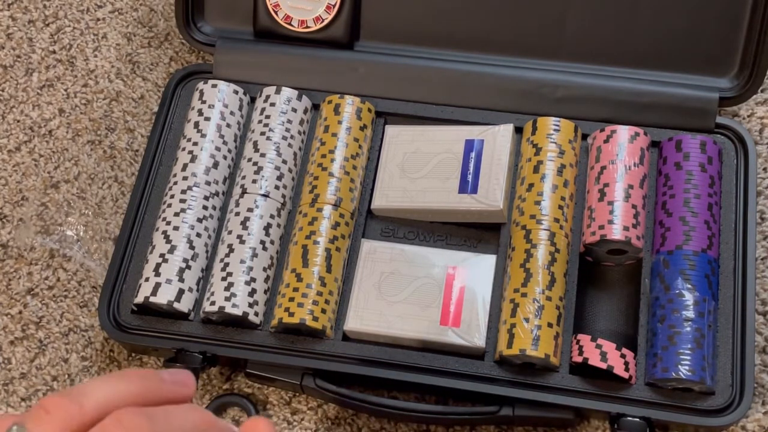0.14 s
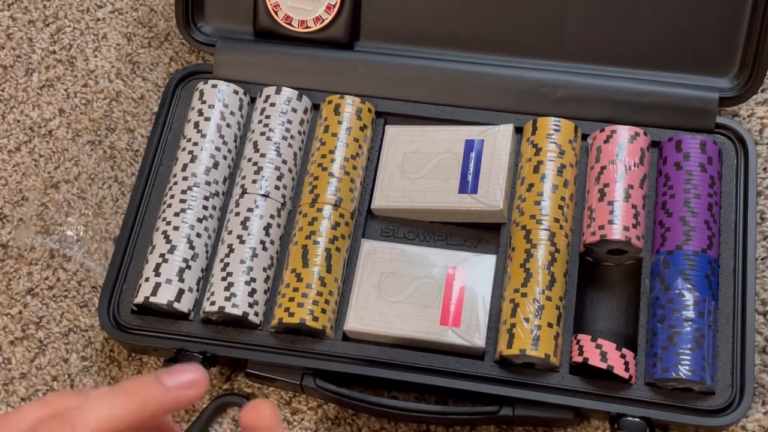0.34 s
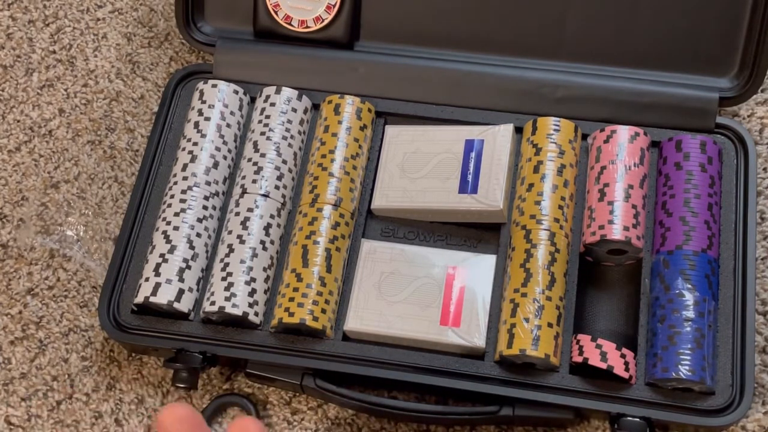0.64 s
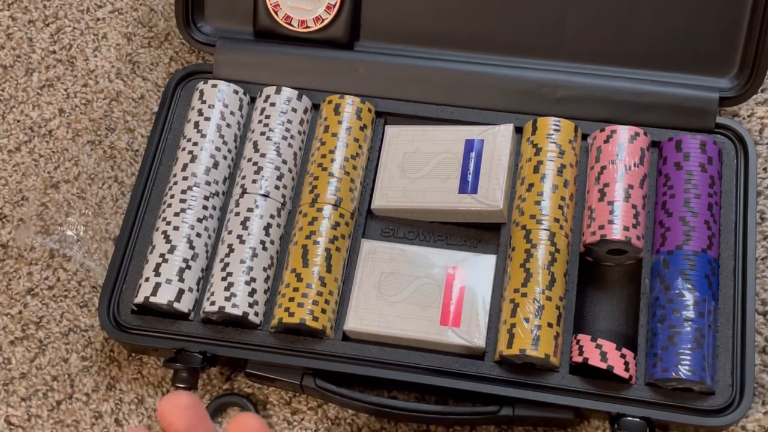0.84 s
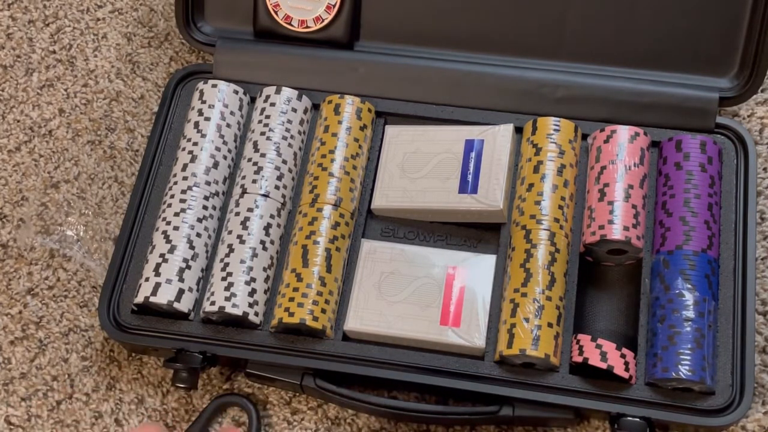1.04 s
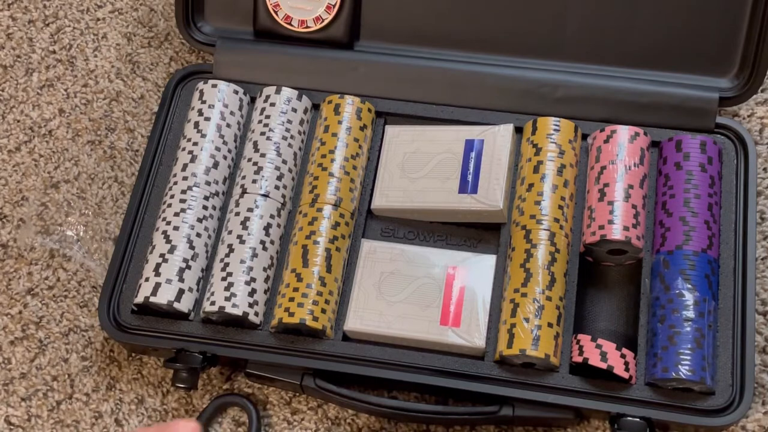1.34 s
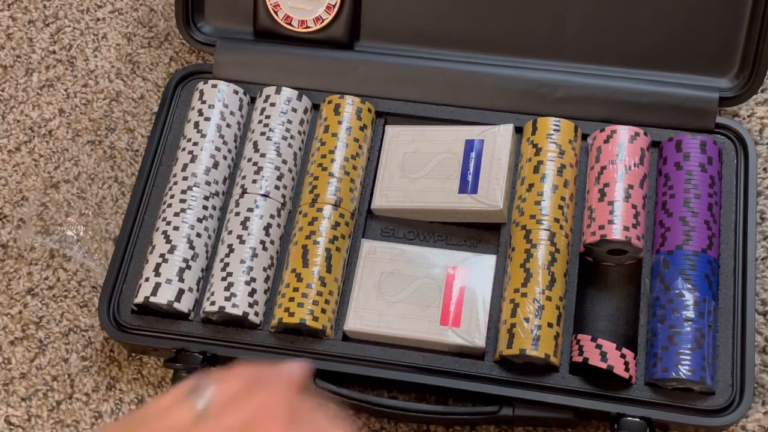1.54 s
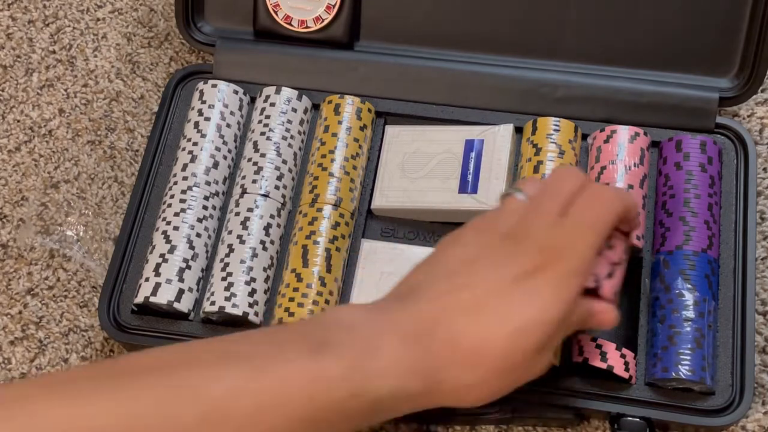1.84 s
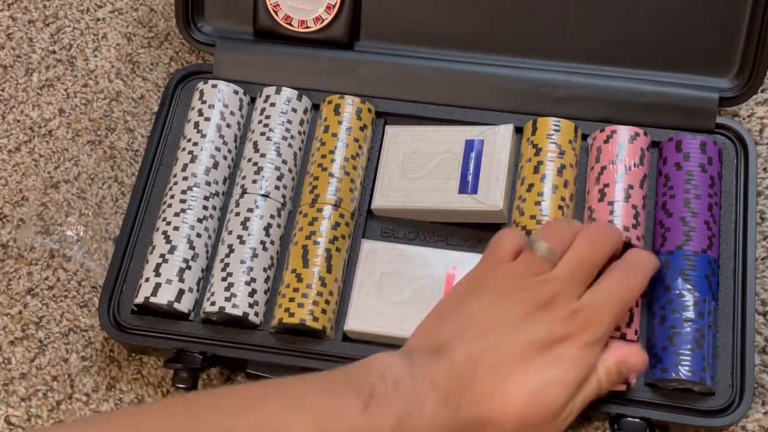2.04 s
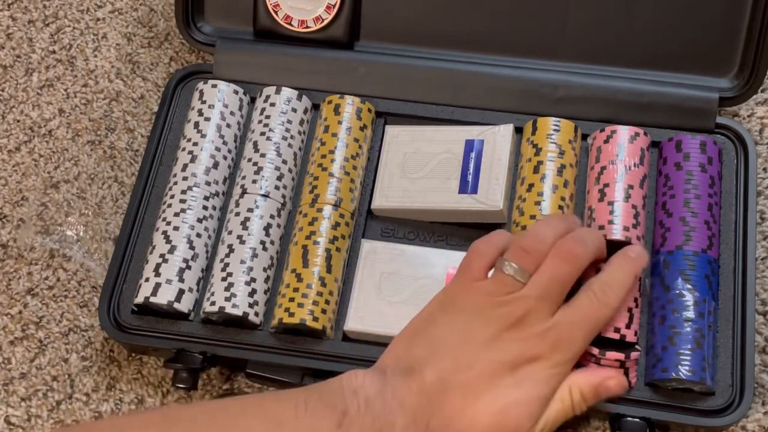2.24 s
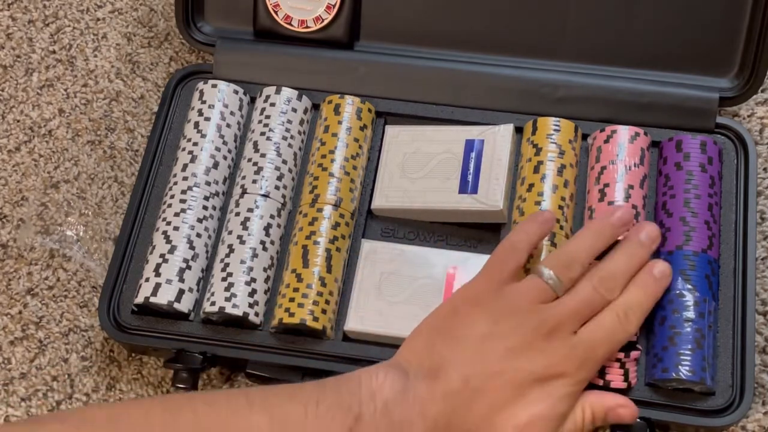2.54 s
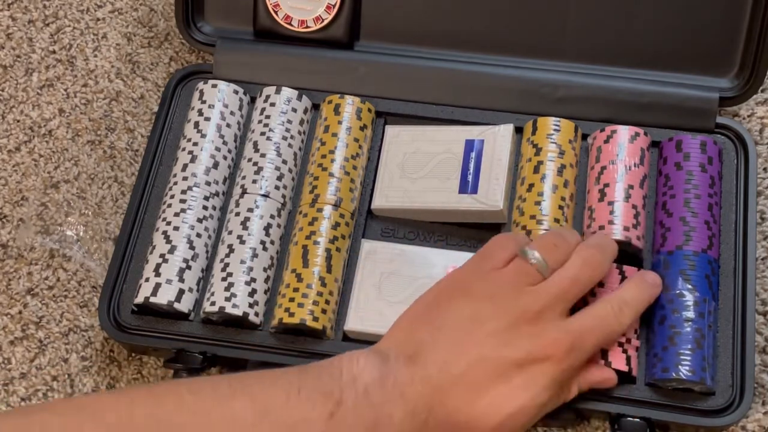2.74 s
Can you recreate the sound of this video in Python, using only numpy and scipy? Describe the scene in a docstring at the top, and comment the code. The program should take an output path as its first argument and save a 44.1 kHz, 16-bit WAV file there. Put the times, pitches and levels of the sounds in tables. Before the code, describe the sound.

Clay poker chips handled close by in a quiet carpeted room. A dull, falling low bump with a light clack at 0.2 s, a loud bright clack at 0.44, then smaller clicks and dry slides until 1.4. After a lull, the stack drops into a hard plastic case at 1.9-2.05 with clustered knocks and thuds. A sharp clack at 2.35, knocks at 2.6, faint rubbing and ticks to the end.

```python
"""In a quiet carpeted room, clay poker chips are gathered by hand and set into a hard plastic case, close by.
A dull bump, a falling low note, comes with the first clack; chips clack and slide in the hand, then the stack
drops into its slot, knocks on the case and is pressed straight. Clacks and knocks are sharp pushes with
micro-bounces through resonances; slides and skin brushes are shaped noise; thuds are decaying low modes.
Noise tails answer from lid and room, over a steady rumble with faint hiss."""
import sys
import numpy as np
from scipy import signal
from scipy.fft import rfft, irfft
from scipy.io import wavfile

SR = 44100
rng = np.random.default_rng(int(sys.argv[2]) if len(sys.argv) > 2 else 0)


def generate_wav(sig):
    """Save sig (samples, or channels by samples) to the path in sys.argv[1] as 16-bit PCM at SR."""
    pcm = np.round(np.clip(np.atleast_2d(sig).T, -1, 1) * 32767).astype(np.int16)
    wavfile.write(sys.argv[1], SR, pcm)


N = 127890  # length in samples
HZ = np.fft.rfftfreq(4096, 1 / SR)  # frequency axis of every resonance spectrum

# room rumble and hiss: f/Hz, relative level/dB
AIR_COLOUR = [(20, -21.5), (35, -20), (50, 5.5), (59, 6.5), (72, 2.5), (110, -9.5), (250, -21), (500, -26),
              (1500, -36.5), (4000, -43.5), (9000, -40.5), (12500, -34), (16000, -55.5)]
# how long the room rings in each band: f/Hz, t60/s
ROOM_DECAY = [(100, 0.38), (300, 0.11), (700, .25), (2000, 0.2), (5000, 0.2), (12000, 0.16), (16000, 0.11)]
# hand and sleeve brushing the case: loudest t/s, swell t/s, fade t/s, level/dB
BRUSH_STROKES = [(0.378, 0.14, 0.24, -69), (1.91, 0.24, 0.15, -61), (2.129, 0.22, 0.18, -66),
                 (2.439, 0.23, 0.049, -67), (2.6, 0.075, 0.11, -59), (2.885, 0.093, .1, -64)]
# broad colour of the brushing: f/Hz, relative level/dB
BRUSH_TONE = [(30, -23), (90, -2.5), (160, 5.5), (330, 5.5), (550, -5.5), (1000, -21), (2000, -18.5),
              (6000, -39.5), (16000, -56)]
# dull pushes on the case floor: t/s, level/dB
FLOOR_PUSHES = [(0.238, -13.5), (.441, -26.5), (0.691, -34), (1.92, -10.5), (1.936, -15), (1.956, -21.5),
                (2.048, -20.5), (2.072, -26.5), (2.351, -27), (2.437, -25), (2.606, -25.5)]
# notes of the case floor: f/Hz, relative level/dB, t60/s
FLOOR_NOTES = [(67.4, -5.5, 0.21), (146.3, 1.5, 0.054), (237, -3, 0.069), (331.3, 2.5, 0.032),
               (434.7, -7, 0.04)]
# case panels ringing after the bump: f/Hz, level against the bump note/dB, t60/s
PANEL_NOTES = [(214, -25, 0.11), (322, -25, 0.12), (403, -27.5, 0.17), (470, -28, .12), (552, -37, 0.17),
               (670, -37.5, .12)]
# stack against its slot: t/s, level/dB, emphasis f/Hz, emphasis/dB, treble shelf/dB, micro-bounce share
SLOT_KNOCKS = [(1.913, -15.5, 12000, 11, -5, 2), (1.9155, -19, 12500, 13, -4, 6),
               (1.9202, -12.5, 5500, 1, 10, 2.7), (1.9225, -4, 917, 8, -10.5, 1.3),
               (1.926, -6.5, 2590, 9.5, 5, 0.68), (1.929, -10.5, 5620, 18, -3.5, 7),
               (1.988, -27, 2149, 8, 0, 0.77), (1.9947, -14, 4810, 12, -0.5, 1.8),
               (2.001, -16, 1834, 17, 5, 1.3), (2.004, -15.5, 1490, 37.5, 3, 0.58),
               (2.0155, -14.5, 1440, 9, -11.5, 0.8), (2.0458, -18, 1780, 22, 8, 0.36),
               (2.047, -9, 1327, 12.5, 1, .4), (2.0495, -55, 1330, 3, -2, .4),
               (2.5995, -12, 1380, 18, -2, 1.08), (2.6025, -11, 2040, 18.5, -5, 1.4),
               (2.6052, -9, 3996, 11, 7, 0.84), (2.6195, -19.5, 2000, 23, 5, 1.6)]
# case resonances: f/Hz, width f/Hz, height/dB
CASE_RESONANCES = [(277, 110, 11), (500, 54, 5), (898, 62, 8.6), (1317, 32, 5.4), (1483, 90, 7.2),
                   (2028, 110, 3.7), (2264, 120, 3), (2622, 150, 8.9), (3260, 460, 3.7), (4270, 68, 1.9),
                   (5100, 280, 6.4), (5400, 170, 10), (6200, 340, 4.7)]
# broad colour of the case: f/Hz, relative level/dB
CASE_TONE = [(60, -1.5), (250, -2.5), (650, -0.5), (1100, 2.5), (2000, -0.5), (4000, -0.5), (6500, -4.5),
             (9000, -5.5), (12000, -2.5), (16000, -25)]
# chips sliding on each other: loudest t/s, swell t/s, fade t/s, level/dB, treble shelf/dB,
# emphasis f/Hz, emphasis/dB
CHIP_SLIDES = [(0.087, 0.041, 0.047, -62, -8, 1550, -4.5), (0.204, .03, 0.11, -55, -9, 2280, -6.5),
               (0.384, 0.099, .1, -58, -0.5, 1800, -4.5), (.612, 0.1, 0.17, -59, -5, 2480, 5),
               (0.648, 0.045, 0.021, -55.5, -23, 5700, 15.5), (.695, 0.07, 0.085, -59, -4, 1300, -6),
               (.835, 0.018, 0.048, -57.5, -8, 1400, 3), (0.911, 0.072, 0.041, -47, -4, 2010, 2.5),
               (0.988, .03, 0.18, -62.5, 5, 2270, 11.5), (1.186, 0.085, 0.125, -69, 2, 1500, 3.5),
               (1.3, 0.051, 0.092, -53.5, 8, 4640, 16.5), (1.37, 0.053, 0.051, -54.5, 3.5, 6050, 11.5),
               (1.859, 0.23, 0.042, -71.5, 1, 937, 12), (1.925, 0.037, 0.045, -39, 4.5, 6000, 3),
               (2.002, 0.034, 0.041, -40, 0, 1580, 3.5), (2.06, 0.058, 0.06, -55.5, 0, 1500, -10.5),
               (2.413, 0.056, .06, -52, -15.5, 2500, 0.5), (2.574, 0.03, 0.033, -53.5, 6, 1890, 6),
               (2.646, 0.056, 0.029, -50, 1, 3890, 8), (2.887, 0.089, 0.15, -52.5, 1.5, 2540, -3.5)]
# rubbed-chip resonances: f/Hz, width f/Hz, height/dB
SLIDE_RESONANCES = [(1350, 170, -1), (2020, 150, 2.5), (3180, 250, 1.5), (4452, 300, 1.5), (5230, 680, 1.5),
                    (6100, 400, 10)]
# broad colour of the rubbing: f/Hz, relative level/dB
SLIDE_TONE = [(60, -20.5), (250, -9), (650, -15.5), (1300, 3), (2200, 1.5), (4000, -7), (6500, -14),
              (9000, -15.5), (12500, -13), (16000, -24)]
# chip against chip: t/s, level/dB, emphasis f/Hz, emphasis/dB, treble shelf/dB, micro-bounce share
CHIP_CLACKS = [(.2094, -16.5, 2480, 7.5, -10.5, 0.52), (.4407, 1.5, 2310, 16, 13, 2),
               (.4443, -3, 2390, 24, 11, 0.24), (.4461, -9.5, 2370, 8, -15, 0.66),
               (.456, -22.5, 2500, 0, -11, 2.2), (.4602, -21, 2500, -5, -15, 1.5),
               (.5275, -28.5, 2440, -2, -24, .5), (.586, -37, 2000, 4, -17, 1),
               (.6075, -32, 2570, 21, -17, 1.3), (.6163, -25.5, 3020, -1, -12, 0.42),
               (.648, -32, 5550, 30, -7, 1.1), (.687, -23, 3100, -1, -19.5, .8),
               (.7353, -12.5, 2180, 3.5, -14.5, 0.96), (.7416, -17.5, 1920, 5, -15.5, 0.71),
               (.906, -22.5, 5100, 19, 9.5, 2.1), (.9135, -25, 2180, -6, -12, 0.49),
               (.921, -22.5, 2140, 38, 9.5, .8), (.9545, -31.5, 1700, 5, -16, 0.75),
               (1.0386, -14.5, 3080, 3.5, -10.5, 3.6), (1.2525, -27.5, 5580, 22, -3.5, 2.4),
               (1.2565, -26.5, 5540, 25, -3, 1.1), (1.2815, -29.5, 5200, 5, 1.5, 1.2),
               (1.2975, -29, 4560, 58, -4, 1.3), (1.322, -30.5, 2780, 6, -6, 0.41),
               (1.403, -38.5, 5800, 6, 2.5, 1.13), (2.351, -1, 3400, 10.5, 0.5, 0.39),
               (2.3634, -10, 3240, 4.5, -7, 0.71), (2.368, -19, 2780, 4, -7, 2.4),
               (2.409, -30, 1960, 9, -2, 1.3), (2.428, -36.5, 1700, 22, 5, 1.4),
               (2.4668, -21.5, 1690, 5, -50, 1.23), (2.5625, -32, 2080, 30.5, 9, 2.5),
               (2.7565, -44, 2200, 12, -4, 0.82), (2.7715, -37.5, 4500, 3, 6, 0.65),
               (2.8765, -24.5, 4500, -24, 4.5, 2.1), (2.8915, -23.5, 2600, 39, 3, 0.39)]
# struck-chip resonances: f/Hz, width f/Hz, height/dB
CHIP_RESONANCES = [(1480, 90, 8), (2070, 130, 6), (2260, 100, 4), (2460, 110, 7), (2980, 110, 6),
                   (3350, 220, 7), (3880, 200, 4), (7000, 320, 10), (11900, 300, 4), (12500, 400, 6)]
# broad colour of the chips: f/Hz, relative level/dB
CHIP_TONE = [(60, -15.5), (250, -18.5), (600, -15), (1100, -2.5), (2000, 0.5), (4000, 1), (5500, -6),
             (9000, -1), (12000, -6.5), (16000, -18)]
# phase between the two microphone ports: f/Hz, left lead/rad
PORT_LEAD = [(100, 0), (220, .15), (450, .1), (690, -.55), (950, 0), (2000, 0), (2900, .6), (5200, .5),
             (5800, -1.5), (6600, -.8), (7100, -1.1), (7600, -2.2), (8800, -3.2), (9500, -3.45),
             (12600, -5.5), (16000, -6.8)]
# balance of the two ports: f/Hz, left minus right level/dB
PORT_LEVEL = [(60, 0), (200, 1.5), (400, .5), (700, -1.6), (1300, .1), (16000, .1)]

AIR_DB = -63.5
ROOM_DB, BUMP_ROOM_DB = -16, -19  # room send of the chips and knocks, and of the low sounds
EARLY_DB, EARLY_T60 = -13, 0.03  # lid reflections: send in dB, decay in s
ROOM_WIDTH, BASS_ROOM_WIDTH, AIR_WIDTH = .45, .9, .18  # side part against the shared part
BUMP_S, BUMP_DB, BUMP_RISE_S, BUMP_T60 = .2102, -9, 0.004, 0.059
BUMP_START_HZ, BUMP_HZ, BUMP_SETTLE_S = 647, 194.7, 0.0026  # the pitch falls from start to rest
CHIP_CHATTER_S, CASE_CHATTER_S = 0.015, .017  # micro-bounces: t60 in s
RING_OCTAVES, TREBLE_HZ = 0.39, 4850  # spread of the emphasis; midpoint of the treble shelf
RIPPLE_DB, RIPPLE_HZ = 2.6, 130  # depth and spacing of the contact ripple
GRAINS_PER_S, GRAIN_SPREAD_DB = 1800, 3.6  # mean rate of slips; scale of their random boosts
SLIDE_SMOOTH = .75  # steady noise against the slips
LOW_CUT_HZ, EDGE_HZ = 47, 16450


def amp(db):
    """Decibels to gain."""
    return 10 ** (np.asarray(db) / 20)


def unit(x):
    """Scales to an energy of one."""
    return x / np.sqrt(np.sum(x ** 2) + 1e-20)


def read(points, hz):
    """Reads a table on a log-frequency axis."""
    f, value = np.transpose(points)
    return np.interp(np.log(hz + 1), np.log(f + 1), value)


def dying(t, t60):
    """Exponential decay, 60 dB down after t60 seconds."""
    return np.exp(-np.log(1000) * t / t60)


def decaying_modes(modes, t):
    """Sum of damped sine modes, each dying at its own speed."""
    return sum(amp(db) * dying(t, t60) * np.sin(2 * np.pi * hz * t) for hz, db, t60 in modes)


def add(mix, s, sound):
    """Adds a sound at its time, cut at the end of the scene."""
    part = mix[max(round(s * SR), 0):][:len(sound)]
    part += sound[:len(part)]


def spread(pair, width):
    """A shared part and a side part as left and right."""
    shared, side = pair
    return np.array([shared + width * side, shared - width * side])


def ring(db):
    """Minimum-phase impulse response with the given dB spectrum: it speaks at once, then rings."""
    log_gain = np.log(amp(np.concatenate([db, db[-2:0:-1]])))
    spectrum = np.exp(np.conj(signal.hilbert(log_gain)))
    return unit(irfft(spectrum[:len(HZ)]))


def body(colour, modes):
    """Spectrum of an object in dB: broad colour and resonant peaks."""
    peaks = sum((amp(db) ** 2 - 1) / (1 + (2 * (HZ - hz) / width) ** 2) for hz, width, db in modes)
    return read(colour, HZ) + 10 * np.log10(np.maximum(1 + peaks, .1))


def treble(db):
    """High shelf in dB: harder contacts are brighter."""
    return db * HZ ** 4 / (HZ ** 4 + TREBLE_HZ ** 4)


def emphasis(ring_hz, ring_db):
    """Bell in dB around the band that a contact favours or, if negative, holds back."""
    octaves = np.log2((HZ + 1) / ring_hz)
    return ring_db * np.exp(-.5 * (octaves / RING_OCTAVES) ** 2)


def ripple():
    """Random narrow peaks and dips in dB: a contact point stresses some resonances more than others."""
    knots = np.arange(0, SR, RIPPLE_HZ)
    return RIPPLE_DB * np.interp(HZ, knots, rng.standard_normal(len(knots)))


def stroke(s, swell, fade, db):
    """Gain of a stroke that rises 20 dB over its swell time and falls 20 dB over its fade time."""
    t = np.arange(N) / SR - s
    steps_down = np.minimum(np.maximum(-t / swell, t / fade), 10)
    return amp(db - 20 * steps_down)


def air():
    """Low rumble and faint hiss of the room: steady noise coloured by a spectrum."""
    colour = amp(read(AIR_COLOUR, np.fft.rfftfreq(N, 1 / SR)))
    noise = irfft(rfft(rng.standard_normal((2, N))) * colour, N)
    return amp(AIR_DB) * spread(noise / noise.std(), AIR_WIDTH)


def echoes(x, t60s, width, delay_s):
    """Dense reflections: a noise tail that starts after a delay, each band dying at its own speed."""
    hz, t, bands = signal.stft(rng.standard_normal((2, SR // 2)), SR, nperseg=128)
    decay = dying(t, read(t60s, hz)[:, None])
    tail = signal.istft(bands * decay, SR, nperseg=128)[1]
    after_delay = np.arange(tail.shape[1]) / SR > delay_s
    tail = spread(tail * after_delay, width)
    return signal.fftconvolve(x[None], tail / np.linalg.norm(tail[0]), axes=1)[:, :N]


def brushes():
    """Skin brushing the hollow case: swelling noise coloured into a soft low rustle."""
    drive = rng.standard_normal(N) * sum(stroke(*row) for row in BRUSH_STROKES)
    return signal.oaconvolve(drive, ring(read(BRUSH_TONE, HZ) + ripple()))[:N]


def thuds():
    """The case floor gives under the chips: low modes that rise softly, damped by the carpet."""
    out, t = np.zeros(N), np.arange(SR // 2) / SR
    soft_rise = 1 - np.exp(-t / 0.0058)
    note = unit(soft_rise * decaying_modes(FLOOR_NOTES, t))
    for s, db in FLOOR_PUSHES:
        add(out, s, amp(db) * note)
    return out


def bump():
    """A soft blow on the hollow case: its pitch drops fast to a short low note, the panels ring on faintly."""
    out, t = np.zeros(N), np.arange(SR // 2) / SR
    hz = BUMP_HZ + (BUMP_START_HZ - BUMP_HZ) * np.exp(-t / BUMP_SETTLE_S)
    note = dying(t, BUMP_T60) * np.sin(2 * np.pi * np.cumsum(hz) / SR)
    panels = decaying_modes(PANEL_NOTES, t)
    soft_rise = 1 - np.exp(-t / BUMP_RISE_S)
    add(out, BUMP_S, amp(BUMP_DB) * soft_rise * (panels - note))  # the note starts downwards
    return out


def hits(table, shape, chatter_s):
    """Each contact is one sharp push and a spray of micro-bounces that ring the object."""
    out, t = np.zeros(N), np.arange(len(HZ)) / SR
    for s, db, ring_hz, ring_db, treble_db, chatter in table:
        tone = ring(shape + emphasis(ring_hz, ring_db) + treble(treble_db))
        bounces = rng.standard_normal(len(t)) * dying(t, chatter_s) * (t > .0002)
        push = chatter * unit(bounces)
        push[0] = 1  # the first impact
        add(out, s, amp(db) * unit(signal.fftconvolve(push, tone)))
    return out


def knocks():
    """The stack strikes its slot and rings the plastic case."""
    return hits(SLOT_KNOCKS, body(CASE_TONE, CASE_RESONANCES), CASE_CHATTER_S)


def slides():
    """Chip faces and rims rub: a dense train of tiny slips over noise that swells and fades."""
    out, shape = np.zeros(N), body(SLIDE_TONE, SLIDE_RESONANCES)
    for s, swell, fade, db, treble_db, ring_hz, ring_db in CHIP_SLIDES:
        slips = rng.standard_normal(N) * (rng.random(N) < GRAINS_PER_S / SR)
        slips *= amp(GRAIN_SPREAD_DB * np.minimum(rng.exponential(1, N), 3))  # some slips are harder
        smooth = SLIDE_SMOOTH * unit(rng.standard_normal(N))
        drive = unit(unit(slips) + smooth) * np.sqrt(N)  # RMS of one
        tone = ring(shape + treble(treble_db) + emphasis(ring_hz, ring_db) + ripple())
        out += signal.oaconvolve(drive * stroke(s, swell, fade, db), tone)[:N]
    return out


def clacks():
    """Chip strikes chip: hard contacts ring the clay discs."""
    return hits(CHIP_CLACKS, body(CHIP_TONE, CHIP_RESONANCES), CHIP_CHATTER_S)


def scene():
    """Chips and case, the quick reflections of the open lid, and the room."""
    chips = clacks() + knocks() + slides()
    low = bump() + thuds() + brushes()
    lid = echoes(amp(EARLY_DB) * chips, [(1000, EARLY_T60)], ROOM_WIDTH, delay_s=0.0014)
    room = echoes(amp(ROOM_DB) * chips, ROOM_DECAY, ROOM_WIDTH, delay_s=.011)
    boom = echoes(amp(BUMP_ROOM_DB) * low, ROOM_DECAY, BASS_ROOM_WIDTH, delay_s=.004)
    return chips + low + lid + room + boom + air()


def record(dry):
    """Two close microphone ports differ in phase and level; then the low cut and the band limit."""
    hz = np.fft.rfftfreq(N, 1 / SR)
    # each port takes half of the difference, in opposite directions
    half = amp(read(PORT_LEVEL, hz) / 2) * np.exp(.5j * read(PORT_LEAD, hz))
    ports = irfft(rfft(dry) * np.array([half, 1 / half]), N)
    low_cut = signal.butter(4, LOW_CUT_HZ, "high", fs=SR, output="sos")
    ports = signal.sosfilt(low_cut, ports)
    band_limit = signal.firwin(255, EDGE_HZ, window=("kaiser", 9), fs=SR)
    return signal.oaconvolve(ports, band_limit[None], "same")


dry = scene()
out = record(dry)
generate_wav(out)
```